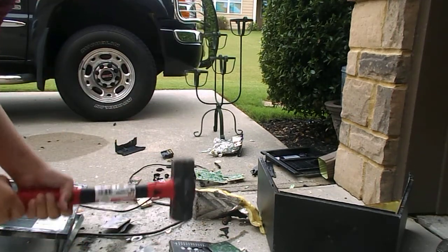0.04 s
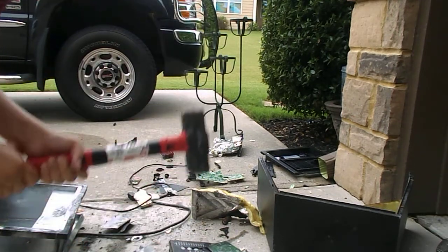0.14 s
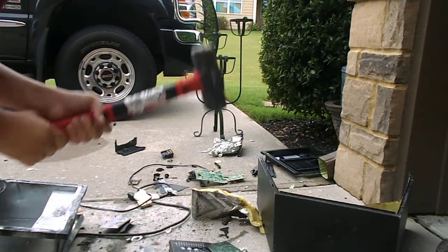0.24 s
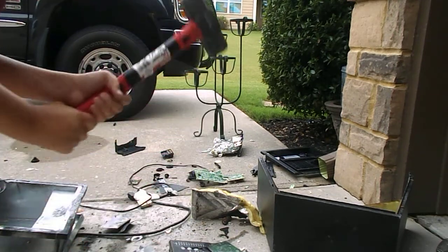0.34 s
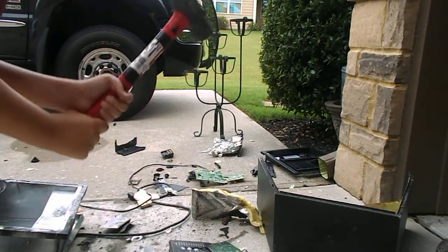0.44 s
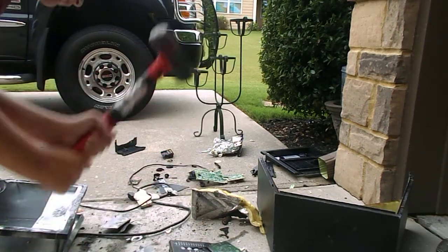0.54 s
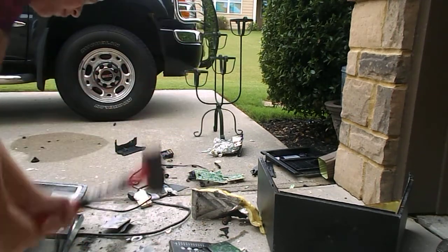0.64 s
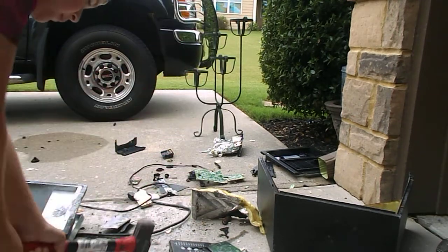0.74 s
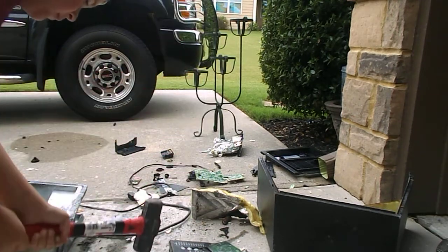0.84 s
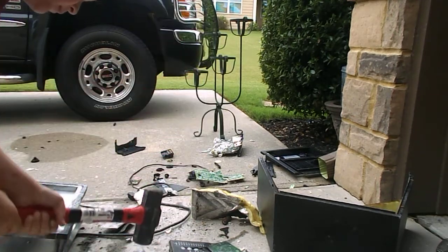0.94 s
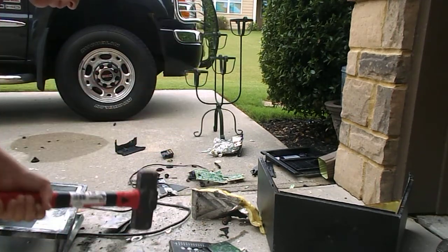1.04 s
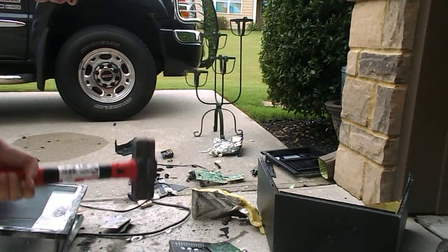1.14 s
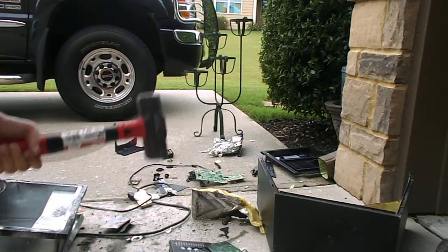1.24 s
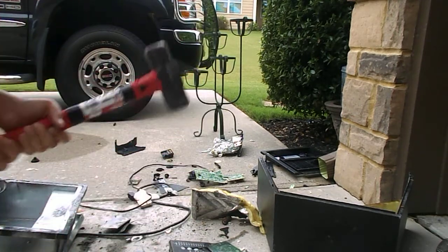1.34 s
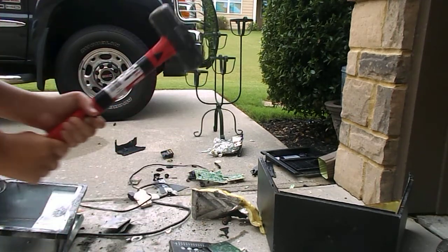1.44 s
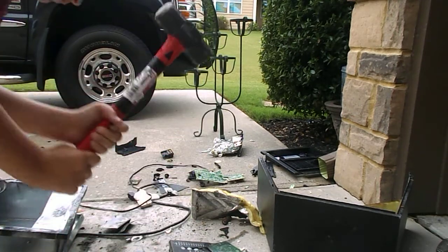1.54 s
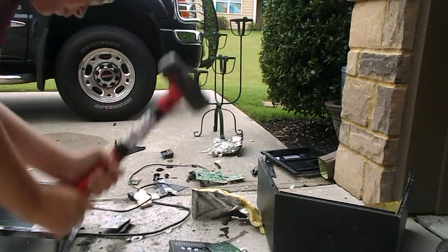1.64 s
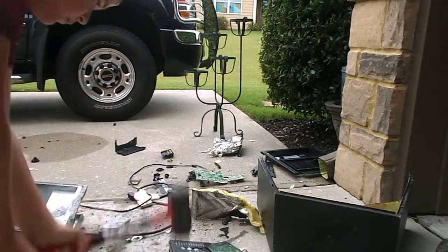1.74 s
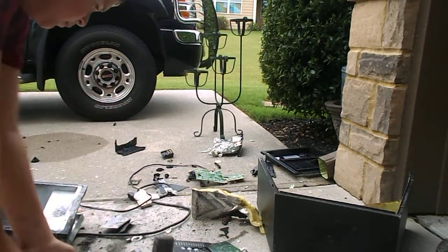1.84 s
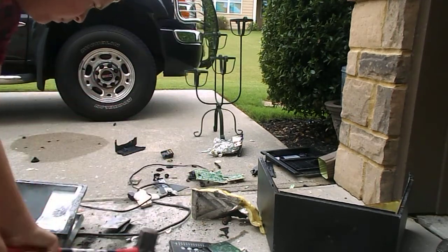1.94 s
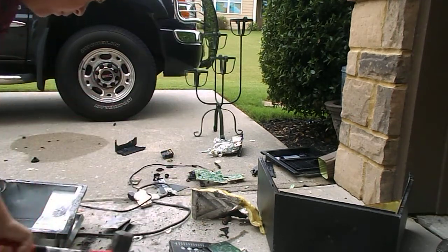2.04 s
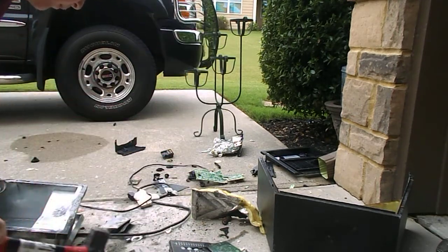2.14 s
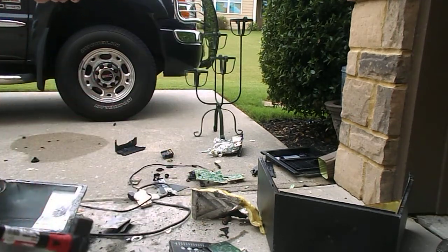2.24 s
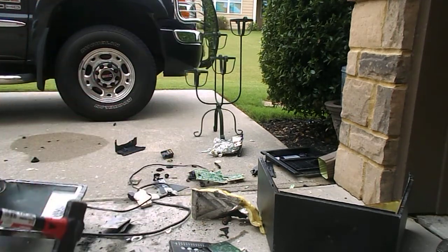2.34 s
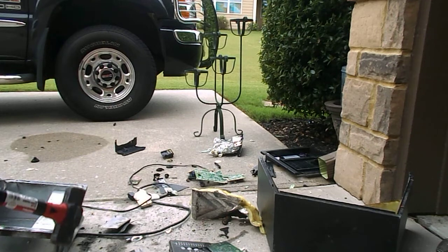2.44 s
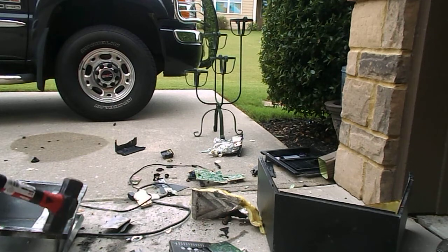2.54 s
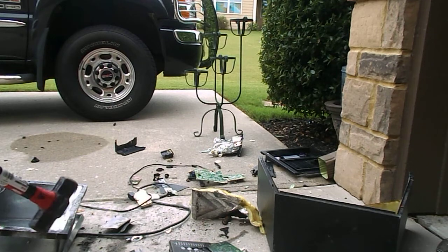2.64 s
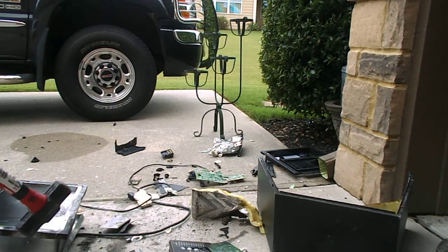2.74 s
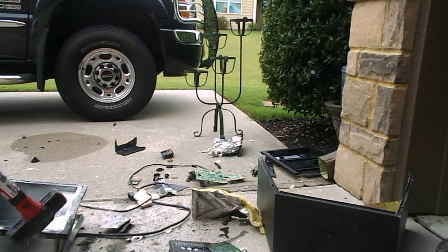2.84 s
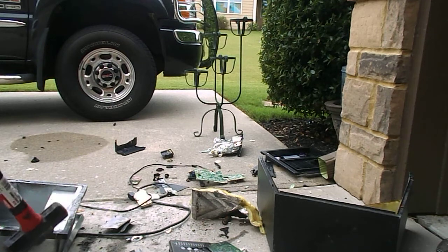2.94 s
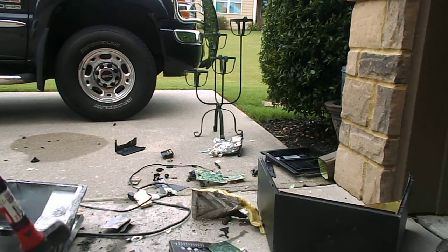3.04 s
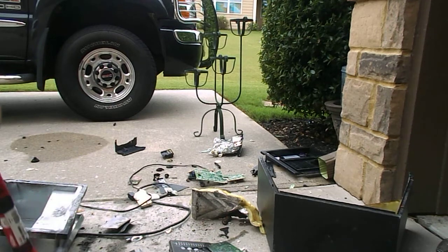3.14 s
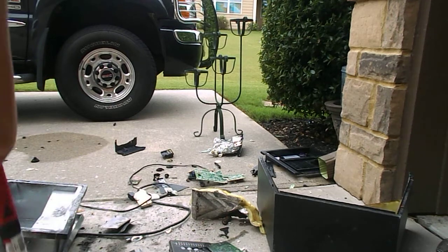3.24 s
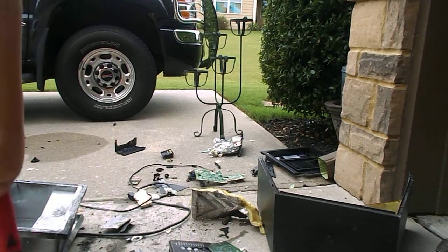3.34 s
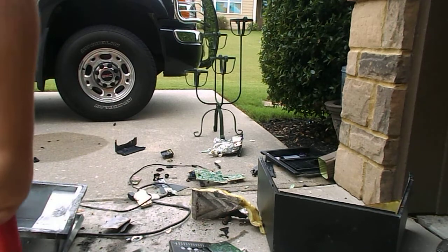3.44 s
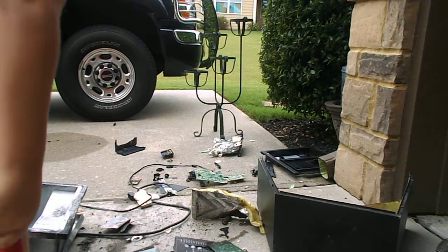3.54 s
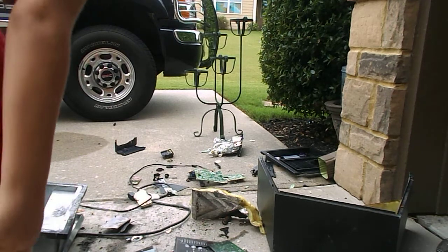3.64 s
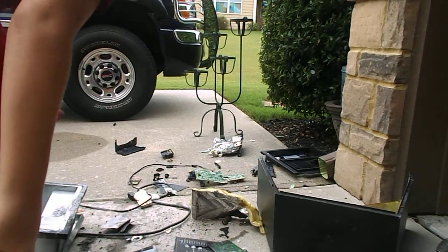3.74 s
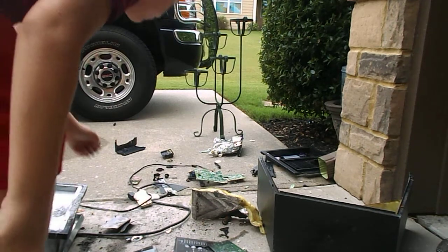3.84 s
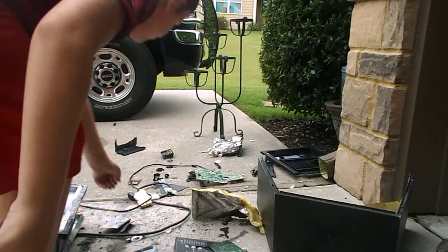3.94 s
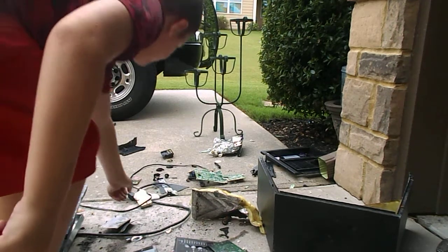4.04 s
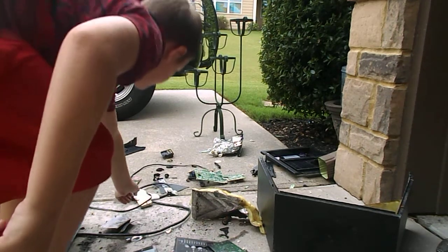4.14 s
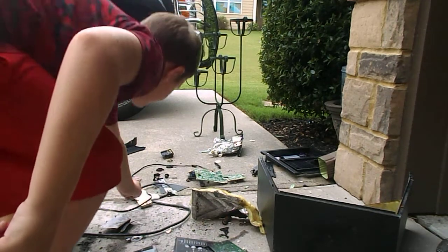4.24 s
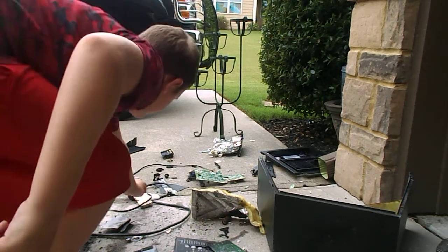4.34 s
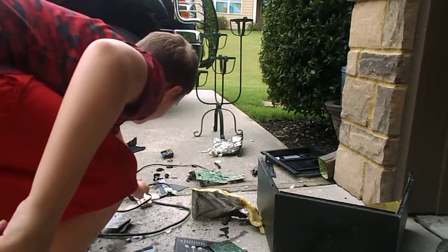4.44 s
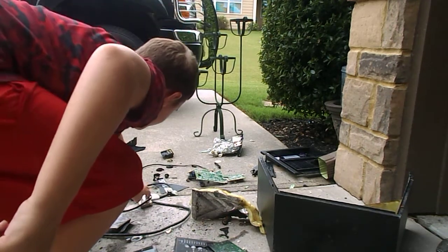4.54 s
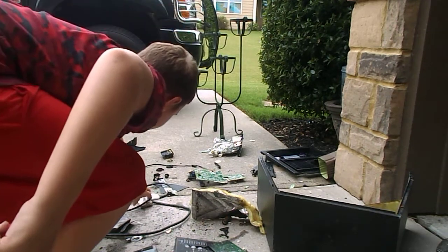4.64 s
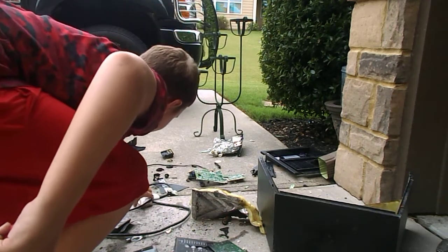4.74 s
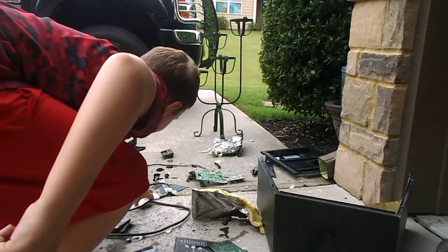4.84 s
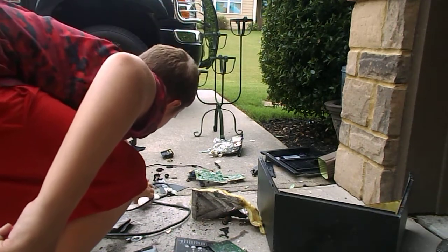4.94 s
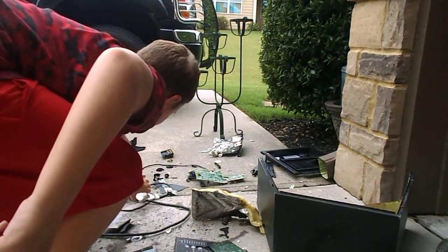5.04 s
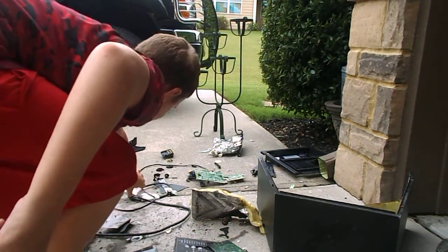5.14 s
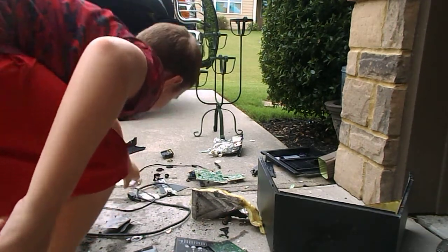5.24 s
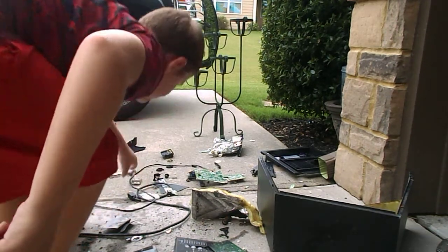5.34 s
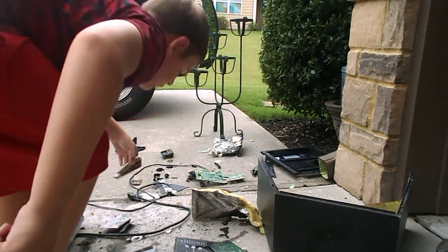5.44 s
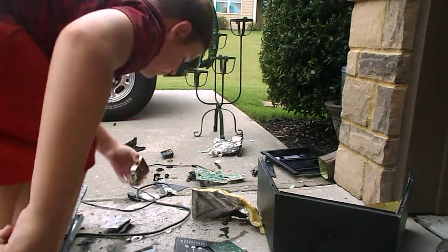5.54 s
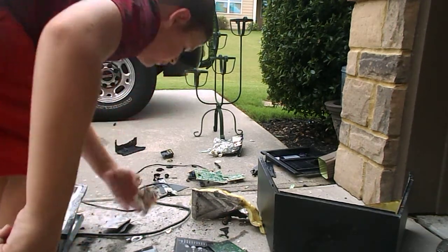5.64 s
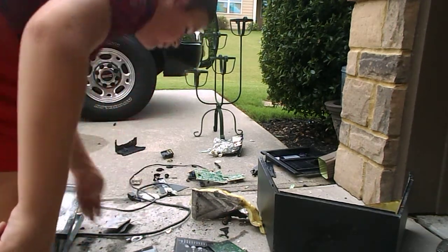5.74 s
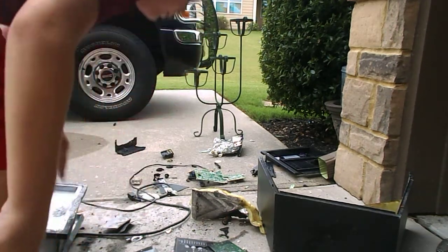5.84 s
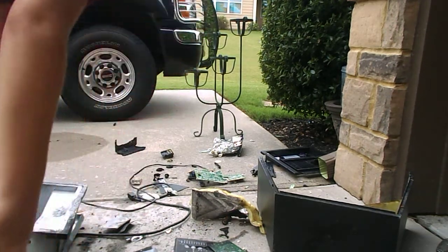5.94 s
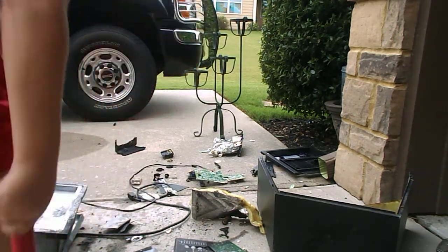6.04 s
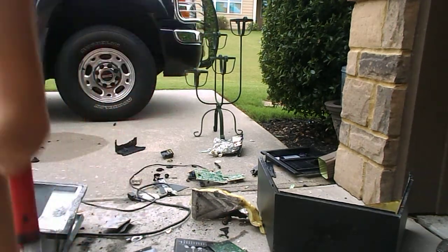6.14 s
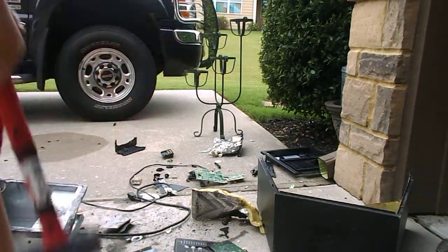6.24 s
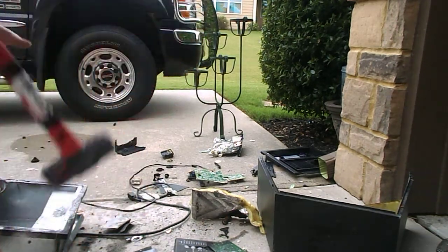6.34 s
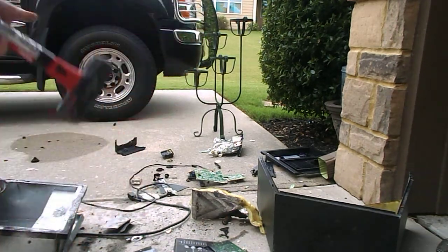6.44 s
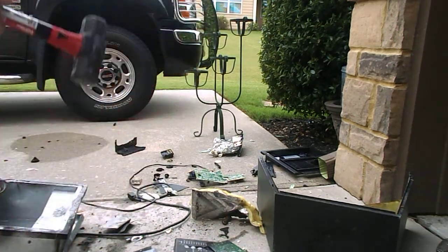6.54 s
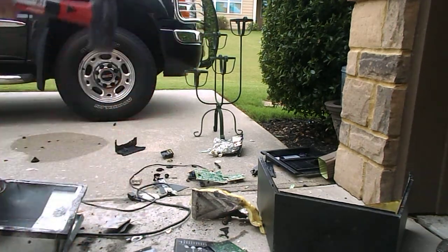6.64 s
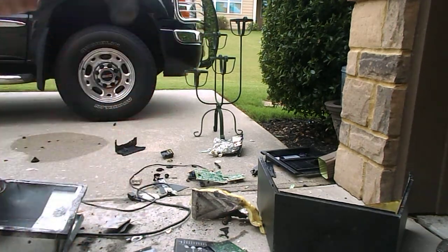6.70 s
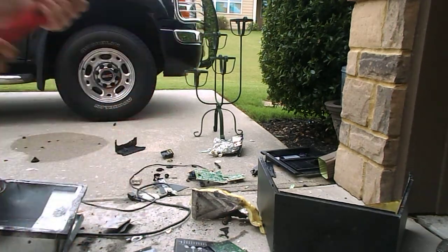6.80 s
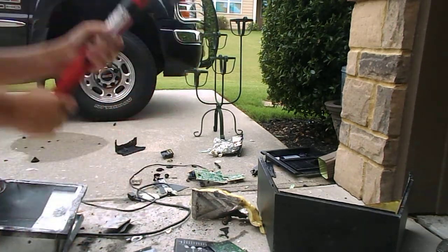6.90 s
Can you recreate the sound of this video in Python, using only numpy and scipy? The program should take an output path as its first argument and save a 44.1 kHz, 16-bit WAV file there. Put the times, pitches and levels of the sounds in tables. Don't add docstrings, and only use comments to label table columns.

```python
import sys
import numpy as np
from scipy import signal
from scipy.fft import rfft, irfft, next_fast_len
from scipy.io import wavfile

SR = 44100
rng = np.random.default_rng(int(sys.argv[2]) if len(sys.argv) > 2 else 0)


def natural_amplitude(level_db):
    exponent = np.asarray(level_db, float) / 20
    return 10 ** exponent


def store_wav(level_fs):
    pcm = np.round(np.clip(np.atleast_2d(level_fs), -1, 1) * 32767)
    wavfile.write(sys.argv[1], SR, pcm.T.astype(np.int16))


N = 307377

# frequency in Hz, level in dB, t60 in s.
BODY_MODES = [(160, -18, 0.04), (237.4, -27, 1), (339, -11.5, 0.085), (486, -9, 0.064),
              (674.4, -4.5, 0.059)]
# start in s, peak in dB, centre in Hz, decay in s.
CLASHES = [(0.791, -3.5, 1280, 0.047), (0.8, 3, 4200, .063), (0.849, -12, 3700, .11),
           (0.923, -1.5, 3620, 0.012), (1.148, -15.5, 2270, 0.046), (1.877, 0, 3280, 0.087),
           (2.071, -4, 2270, .064), (2.104, -14.5, 1300, 0.055), (2.24, -11.5, 1700, 0.028),
           (2.366, -32, 1280, .056), (3.526, -34, 1220, .11), (3.532, 0, 3380, 0.15),
           (3.637, -16, 1620, .076), (3.872, -18, 2320, 0.04), (3.913, -12.5, 4010, 0.05),
           (5.877, -3, 2300, 0.28), (6.003, -14, 1720, 0.083), (6.039, -11.5, 1540, 0.057),
           (6.279, -11, 3760, 0.094), (6.33, -9, 4800, .015)]
# start in s, peak in dB.
BOUNCES = [
    (1.277, -23.5),
    (1.38, -25.5),
    (1.465, -25),
    (1.532, -26.5),
    (1.634, -33),
]
SMALL_FADE = 0.1


def in_time(rows):
    s, *columns = np.transpose(rows)
    return [np.interp(np.arange(N) / SR, s, c) for c in columns]


def at_hz(points, hz):
    point_hz, point_db = np.transpose(points)
    return np.interp(np.log(hz), np.log(point_hz), point_db)


def rms_one(x):
    return x / np.sqrt(np.mean(x ** 2) + 1e-20)


def highpass(x, order, hz):
    return signal.sosfilt(signal.butter(order, hz, "high", fs=SR, output="sos"), x)


def bandpass(x, order, edges_hz):
    return signal.sosfilt(signal.butter(order, edges_hz, "band", fs=SR, output="sos"), x)


def drift(rate):
    r = np.exp(-80 * np.pi * rate / SR)
    slow = signal.lfilter([1], [1, -2 * r, r * r], rng.standard_normal(N // 40 + 2002))[2000:]
    return np.interp(np.arange(N) / 40, np.arange(len(slow)), rms_one(slow))


def ring(clicks, hz, t60):
    r, w = natural_amplitude(-60 / (t60 * SR)), 2 * np.pi * hz / SR
    return signal.lfilter([0, np.sin(w)], [1, -2 * r * np.cos(w), r * r], clicks + 1e-18)


def coloured(x, spectrum):
    size = next_fast_len(N)
    hz = np.arange(1, size // 2 + 2) * SR / size
    return irfft(rfft(x, size) * natural_amplitude(at_hz(spectrum, hz)), size)[:N]


def rattle(per_s, spread_db):
    sizes = natural_amplitude(spread_db * np.minimum(rng.exponential(1, N), 4)) * rng.choice([-1, 1], N)
    return rms_one(sizes * (rng.random(N) < per_s / SR))


BENDING = drift(27.0)


def air():
    # frequency in Hz, level in dB per Hz.
    spectrum = [(24, -55.5), (45, -30.5), (100, -6), (200, -3.5), (330, -13), (400, -11), (900, -18.5),
                (1900, -22), (3900, -21), (6000, -52), (8000, -23.5), (12000, -18.5)]
    return natural_amplitude(-50 + 0.58 * drift(2.5)) * rms_one(coloured(rng.standard_normal(N), spectrum))


def drone():
    # time in s, first firing order in dB, second order in dB; both sink briefly under the heavy hits
    # # near 1.9, 3.6 and 5.9 s.
    order_levels = [(0.0, -63, -54), (0.25, -62, -77), (0.6, -64, -60.5), (1.3, -74, -62.5),
                    (1.63, -59.5, -58), (1.92, -65, -78), (2.3, -55, -62), (2.93, -76, -61),
                    (3.18, -60, -61), (3.62, -67, -67), (3.9, -55, -61), (4.25, -52.5, -56),
                    (4.85, -49, -67), (5.3, -52.5, -68), (5.8, -49, -50.5), (5.92, -62, -77),
                    (6.08, -49.5, -55), (6.97, -53.5, -58)]
    first_db, second_db = in_time(order_levels)
    third_db = -62.5 + 0.1 * (first_db - first_db.mean())
    levels_db = [first_db + 2.5, second_db + 3.5, third_db]
    firing_hz = 99 * (1 + 0.005 * drift(2.86))
    phase = 2 * np.pi * np.cumsum(firing_hz) / SR
    orders = [natural_amplitude(db + 1.5 * drift(2.6)) * np.sin((k + 1) * phase) for k, db in enumerate(levels_db)]
    fourth = natural_amplitude(third_db - 6.0 + 4.3 * drift(2.4)) * np.sin(4 * phase)
    return sum(orders) + fourth


def insect():
    # time in s, level in dB.
    nearness = [(4.5, -70), (4.732, -62.5), (4.86, -58.5), (5.108, -53.5), (5.27, -54), (5.85, -53)]
    wings = rattle(per_s=5000, spread_db=1.5)
    shoulder = rms_one(ring(wings, 5800, .0025))
    buzz = rms_one(ring(wings, 5310, .011)) + natural_amplitude(-1.0) * shoulder
    buzz = highpass(buzz, 10, 5160)
    return natural_amplitude(in_time(nearness)[0] + 1.9 * drift(37.0)) * rms_one(buzz)


def housing():
    mode_hz = [711, 824, 1150, 1297, 1567, 1825, 2056, 2304]
    # level in dB, t60 in s.
    mode_decays = [(-39, 1.15), (-25.5, 1.14), (-42, 1.7), (-24.5, 0.97), (-36, 0.77), (-57, 2.7),
                   (-40, 1.05), (-29, 0.67)]
    blow = np.arange(N) == 0
    return sum(natural_amplitude(db - 0.5) * ring(blow, hz, t60) for hz, (db, t60) in zip(mode_hz, mode_decays))


def drag():
    # start in s, end in s, level in dB.
    stroke_times = (5.53, 5.72, -56)
    # frequency in Hz, level in dB, t60 in s.
    part_modes = [(1280, 2, 0.03), (2590, 5, 0.026), (4530, -1.5, .004)]
    start, end, db = stroke_times
    stroke = np.sin(np.pi * np.clip((np.arange(N) / SR - start) / (end - start), 0, 1))
    slips = rattle(per_s=8400, spread_db=2.5)
    part = sum(natural_amplitude(mode_db) * rms_one(ring(slips, hz, t60)) for hz, mode_db, t60 in part_modes)
    return natural_amplitude(db) * stroke * part


def lid():
    # time in s, level in dB.
    clacks = [
        (4.129, -35),
        (4.137, -41),
        (4.147, -30.5),
    ]
    # frequency in Hz, level in dB, t60 in s.
    lid_modes = [(983, -3.5, 0.052), (1080, -6.5, 0.068)]
    touches = np.zeros(N)
    for s, db in clacks:
        touches[round(s * SR)] = natural_amplitude(db)
    return sum(natural_amplitude(db) * ring(touches, hz, t60) for hz, db, t60 in lid_modes)


def thump():
    # time in s, peak in dB, decay in s.
    drop_event = [
        (3.726, -14.5, 0.089),
    ]
    (s, peak_db, t60), = drop_event
    t = np.arange(N) / SR - s
    push = rng.standard_normal(N) * (t >= 0) * natural_amplitude(-60 * np.abs(t) / t60)
    modes = sum(natural_amplitude(db) * ring(push, hz, t60) for hz, db, t60 in BODY_MODES)
    body = rms_one(bandpass(push, 2, [140, 600])) + natural_amplitude(-4.5) * rms_one(modes)
    body = body + natural_amplitude(-3) * rms_one(ring(push, 271.5, 0.12))
    body = highpass(body, 4, 105)
    return natural_amplitude(peak_db + 6.0) * body / np.abs(body).max()


def blows():
    # time in s, level in dB, low ring in Hz, high ring in Hz.
    square_hits = [
        (0.7935, -6.5, 1096, 3830),
        (1.8763, -3, 1450, 3170),
    ]
    out = np.zeros(N)
    for s, db, low_hz, high_hz in square_hits:
        click = natural_amplitude(db) * (np.arange(N) == round(s * SR))
        out += ring(click, low_hz, 0.0061) + natural_amplitude(-9.0) * ring(click, high_hz, 0.028)
    return out


def knocks():
    # time in s, peak in dB, centre in Hz.
    scraps = [(3.263, -38.5, 1983), (3.286, -32, 2040), (3.359, -20.5, 4070), (4.042, -28.5, 3050),
              (4.096, -34, 3350), (4.122, -23, 4540), (4.132, -13, 4760), (4.138, -35, 1300),
              (4.146, -11.5, 4230), (4.251, -34, 2180), (4.469, -30.5, 4000), (4.491, -45, 2560),
              (4.548, -36.5, 2520),
              (4.676, -18.5, 4540), (4.792, -30, 2860), (4.93, -33, 2480), (5.029, -37, 2250),
              (5.069, -39, 5190), (5.169, -37, 4150), (5.396, -31, 5320), (5.445, -36, 5440),
              (5.692, -24.5, 5450), (5.827, -40, 1050),
              (6.442, -16.5, 5440), (6.515, -20.5, 2310), (6.538, -13, 2250), (6.554, -22, 1330),
                (6.574, -10, 4170), (6.587, -18.5, 2210), (6.592, -12, 2480), (6.756, -30.5, 3200),
                (6.836, -22.5, 4720), (6.863, -26, 3050), (6.878, -31.5, 2100), (6.948, -30.5, 3400)]
    # time in s, level in dB.
    heavy = [(1.146, -26), (1.38, -41), (1.877, -25), (2.105, -36), (3.637, -32), (3.87, -19.5),
             (4.145, -45), (4.25, -37), (6.004, -29), (6.33, -21.5), (6.442, -35)]
    # frequency in Hz, level in dB, t60 in s.
    panel_modes = [(577, 0.5, 0.2), (610, -29, 0.3), (645, -5, 0.73), (2070, -7, 0.57), (2380, -8, 0.38),
                   (3630, -17, 0.11), (3770, -7, 0.12), (3760, 0.5, 0.41), (3995, -13.5, 0.1),
                   (3970, -1, 0.13), (4460, 0, 0.057), (4230, 9, 0.045), (4770, 4.5, 0.084)]
    bounce_hz, bounce_t60_s, scrap_t60_s = 4000, 0.23, 0.045
    panel_damping = .65

    contacts = [(*row, False) for row in CLASHES]
    contacts += [(*row, bounce_hz, bounce_t60_s, True) for row in BOUNCES]
    contacts += [(*row, scrap_t60_s, False) for row in scraps]
    contacts.sort()
    length = 9000
    out, thumps, bounces = np.zeros(N + length), np.zeros(N), np.zeros(N)
    t = np.arange(length) / SR
    noises = rng.standard_normal((len(contacts), length))
    spreads = rng.uniform(-0.884, 1, (len(contacts), 7))
    for (s, peak_db, hz, t60, on_panel), noise, spread in zip(contacts, noises, spreads):
        t60 = np.clip(t60, .01, .25)
        crack = noise * natural_amplitude(-60 * t / .006)
        crack[0] = 2.54
        scuff = crack + natural_amplitude(-11.5 - 60 * t / t60) * noise
        coloured_crack = bandpass(scuff, 1, np.clip([hz / 2.2, hz * 1.8], 300, 11000))
        edge = highpass(scuff, 3, 6500)
        modes = sum(ring(scuff, pitch, t60 * .5) for pitch in np.r_[hz, hz * 1.8 ** spread])
        body = coloured_crack / np.abs(coloured_crack).max()
        body += natural_amplitude(-26.0) * modes / np.abs(modes).max()
        body += 1.1 * edge / np.abs(edge).max()
        at = round(s * SR)
        out[at:at + length] += natural_amplitude(peak_db + 2.0) * body
        thumps[at] = natural_amplitude(-52)
        bounces[at:at + length] = natural_amplitude(peak_db) * scuff[:N - at] * on_panel
    for s, db in heavy:
        thumps[round(s * SR)] += natural_amplitude(db)
    soft = signal.lfilter([.12], [1, -.88], thumps)
    thuds = sum(natural_amplitude(db - 5.0) * ring(soft, hz, t60) for hz, db, t60 in BODY_MODES)
    panel = 0
    for hz, db, t60 in panel_modes:
        panel = panel + natural_amplitude(db - 36.5) * ring(bounces, hz, panel_damping * np.clip(t60, .05, .5))
    return out[:N] + thuds + panel


def sheet_colour(x):
    # frequency in Hz, level in dB per Hz.
    spectrum = [(150, -52.5), (300, -28), (580, -10), (780, 1), (1500, 0.5), (4200, 3.5), (6000, -6.5),
                (7600, 5), (9200, 7), (10800, 15), (13000, 3)]
    return rms_one(coloured(x, spectrum))


def sheet_modes(low_hz, high_hz, count, t60):
    kicks, out = rattle(per_s=5000, spread_db=2.2), 0
    pitches = np.linspace(low_hz, high_hz, count) * natural_amplitude(rng.normal(0, .1, count))
    for hz, lag in zip(pitches, rng.integers(0, N, count)):
        out = out + ring(np.roll(kicks, lag), hz, t60) * natural_amplitude(6.9 * np.roll(BENDING, lag))
    hiss = bandpass(kicks, 3, [low_hz, high_hz])
    return sheet_colour(rms_one(out) + rms_one(hiss))


def ducking():
    from_db, share, recovery_s = -9, 0.4, 0.1
    t = np.arange(N) / SR
    lost_db = np.zeros(N)
    for s, db, _, _ in CLASHES:
        lost_db += share * max(db - from_db, 0) * (t >= s) * np.exp(-np.abs(t - s) / recovery_s)
    return -lost_db


def effort(rows, fade_db_per_s, per_small):
    tail_db, tail_db_per_s = -20.5, 54
    power = np.zeros(N)
    for s, hold, db, small_db, rise_s, damping in rows:
        at = round(s * SR)
        t = np.arange(min(N - at, SR)) / SR
        after = np.maximum(t - hold, 0) * natural_amplitude(SMALL_FADE * small_db)
        fade = natural_amplitude(-2 * damping * fade_db_per_s * after) + natural_amplitude(2 * (tail_db - tail_db_per_s * after))
        rise = np.minimum(t / rise_s + (at == 0), 1)
        power[at:at + SR] += natural_amplitude(2 * (db + per_small * small_db)) * fade * rise ** 2
    return np.sqrt(power)


def crash():
    # start in s, shaken for s, level in dB, smallness in dB
    shaken = [(0.0, 0.088, -24, -1.5), (0.79, 0.011, -23, 0.5), (0.847, 0.19, -22, -0.5),
              (0.973, 0.031, -23, -5), (1.148, 0.011, -37.5, -2), (1.27, 0.31, -52.5, -7.5),
              (1.879, 0.34, -24, 1), (2.059, 0.031, -20.5, -0.5), (2.201, 0.017, -27, -8.5),
              (2.237, 0.058, -24.5, 0.5), (2.363, 0.043, -31, -5.5), (3.53, 0.18, -23.5, 4),
              (3.626, 0.045, -27, -5), (3.75, 0.049, -29.5, -3.5), (3.868, 0.023, -32, 4),
              (5.875, 0.27, -23.5, -1), (5.954, 0.013, -36, -10), (6.0, 0.017, -28, 4),
              (6.11, 0.0075, -32, 2.5), (6.155, 0.031, -27, 0), (6.279, 0.047, -34.5, 5)]
    # start in s, length in s, level in dB, smallness in dB.
    scuffs = [(0.33, 0.15, -60, 10), (2.78, 0.42, -69, 7), (3.216, 0.069, -50.5, 5),
              (3.33, 0.022, -44.5, 15), (4.12, 0.014, -40, 4.5), (4.14, 0.0053, -42, 5),
              (4.448, .05, -54, 8), (4.67, 0.0039, -49.5, 13), (4.79, .012, -53.5, 3),
              (4.917, 0.01, -50.5, 12), (5.012, 0.026, -54, 0.5), (5.187, 0.26, -61.5, 1),
              (5.483, 0.26, -54, 0.5), (5.803, 0.024, -48, -3), (6.393, 0.063, -48, 19),
              (6.508, 0.026, -37.5, 12), (6.578, 0.0042, -27.5, 9.5), (6.832, .015, -44, 23),
              (6.852, 0.0099, -43.5, 9), (6.937, 0.018, -51.5, 21)]
    # length in s, level in dB under the peak, smallness in dB.
    bounce_rattle = (0.0041, -19, 5.3)
    panel_fades = [115.5, 169.5, 152]
    # start in s, end in s.
    on_tray = [
        (1.87, 3.0),
        (5.87, 6.97),
    ]
    # frequency in Hz, level in dB, t60 in s.
    tray_modes = [(740, -12, 0.52), (806, -8, 0.38), (930, -30, 0.13), (1102, -11.5, 0.42),
                  (1128, -10.5, 0.29), (1264, -14, 0.25), (1660, -24.5, 0.21), (1670, -15, 0.086),
                  (2114, -6, 0.16), (2300, -2.5, 0.13), (2670, -23, 0.52), (3470, -8, 0.15),
                  (3400, -26.5, 0.33)]
    rise_s, scuff_fade = 0.002, 1.55
    small_low, small_high, small_edge = -0.96, 0.34, 0.51

    low = sheet_modes(255.0, 1506.5, count=24, t60=0.098)
    middle = sheet_modes(1516, 3006, count=24, t60=0.047)
    high = sheet_modes(2956, 6900, count=40, t60=0.039)
    edges = natural_amplitude(9.5) * sheet_colour(highpass(rattle(per_s=2900, spread_db=3.5), 4, 6900))

    duck = natural_amplitude(ducking() + 1.5 * BENDING)
    hold, under_db, small_db = bounce_rattle
    shakes = [(*row, rise_s, 1) for row in shaken]
    small = [(*row, row[1], scuff_fade) for row in scuffs]
    small += [(s, hold, db + under_db, small_db, rise_s, 1) for s, db in BOUNCES]
    every = shakes + small
    low_fade, middle_fade, high_fade = panel_fades
    lows = duck * effort(every, low_fade, small_low)
    mids = duck * effort(every, middle_fade, 0)
    highs = duck * effort(every, high_fade, small_high)
    rubbing = duck * effort(every, 208, small_edge)
    out = natural_amplitude(-3.0) * lows * low + mids * middle + natural_amplitude(-1.3) * highs * high
    out += rubbing * (mids / natural_amplitude(8.0)) ** 0.033 * edges

    tray_shakes = []
    for s, hold, db, *rest in shakes:
        lands = any(a < s < b for a, b in on_tray)
        tray_shakes.append((s, hold, db if lands else db - 8, *rest))
    kicks = natural_amplitude(-33) * duck * effort(tray_shakes, low_fade, small_low) * rattle(per_s=1500, spread_db=2.5)
    return out + sum(natural_amplitude(db) * ring(kicks, hz, t60) for hz, db, t60 in tray_modes)


def scene():
    limit_db = -21
    metal = crash() + housing() + knocks() + blows() + drag() + lid()
    metal = highpass(metal, 4, 170) + thump()
    loud_db = 10 * np.log10(signal.lfilter([.002], [1, -.998], metal ** 2) + 1e-12)
    sink = natural_amplitude(-.5 * np.maximum(loud_db - limit_db, 0))
    return (metal + sink * (air() + insect()) + drone())[None]


def band_limit(x):
    return signal.sosfilt(signal.butter(12, 12060, fs=SR, output="sos"), x)


def record(dry):
    ceiling = .73
    size = next_fast_len(N)
    hz = np.fft.rfftfreq(size, 1 / SR)
    taps = signal.firwin(numtaps=16, cutoff=6050, window="boxcar", fs=24000)
    treble = np.cos(2 * np.pi * np.outer(hz / 24000, np.arange(16) - 7.5)) @ taps * (hz < 11900)
    rumble = signal.sosfilt(signal.butter(2, 60, fs=SR, output="sos"), dry)
    b, a = signal.iirpeak(10800, 4.0, fs=SR)
    peaked = dry + 3.34 * signal.lfilter(b, a, dry)
    x = irfft(rfft(peaked, size) * treble, size)[:, :N]
    x = ceiling * np.tanh((np.abs(x) / ceiling) ** 6) ** (1 / 6) * np.sign(x)
    x = highpass(x, 4, 75) + natural_amplitude(7.0) * rumble
    return band_limit(x)


dry = scene()
out = record(dry)
store_wav(out)
```